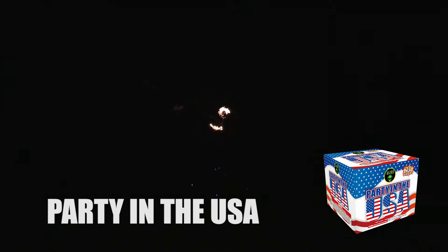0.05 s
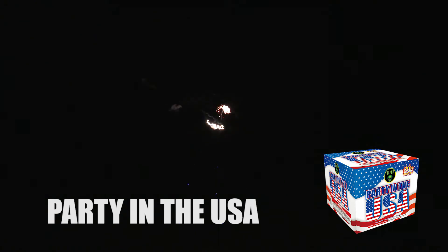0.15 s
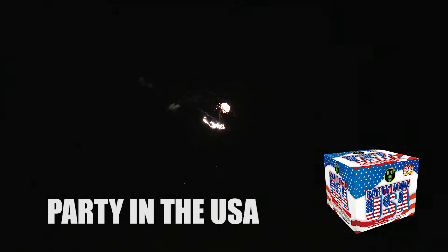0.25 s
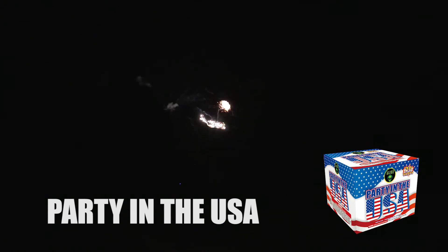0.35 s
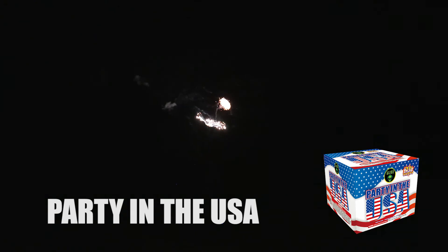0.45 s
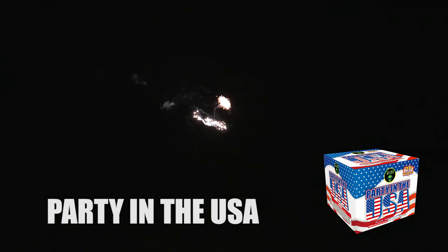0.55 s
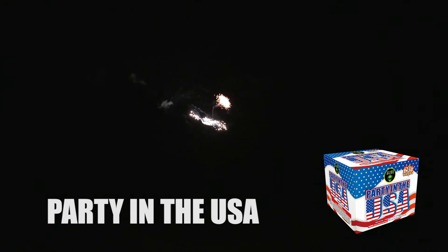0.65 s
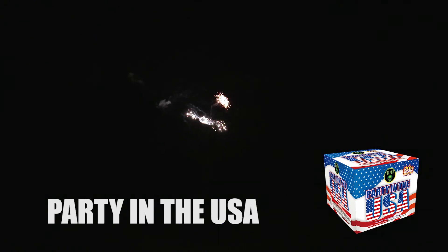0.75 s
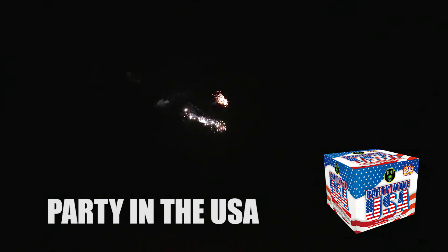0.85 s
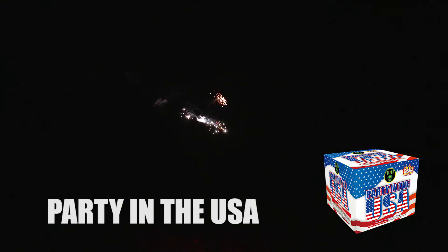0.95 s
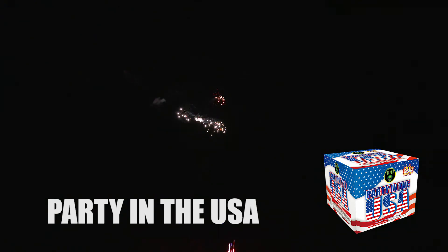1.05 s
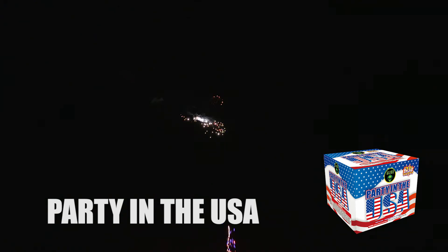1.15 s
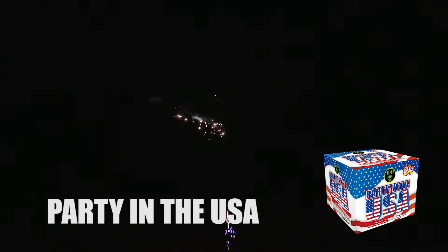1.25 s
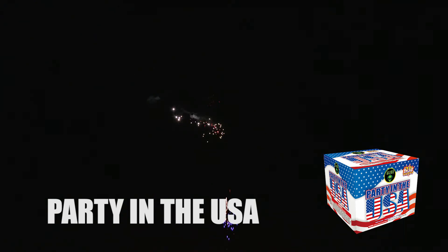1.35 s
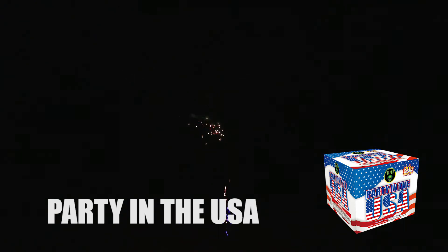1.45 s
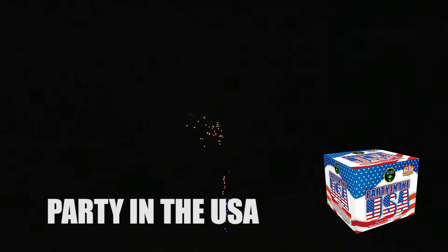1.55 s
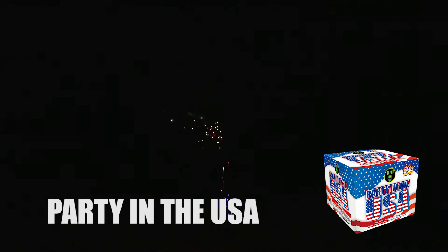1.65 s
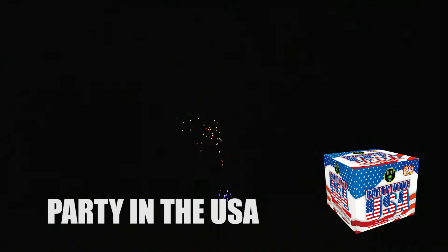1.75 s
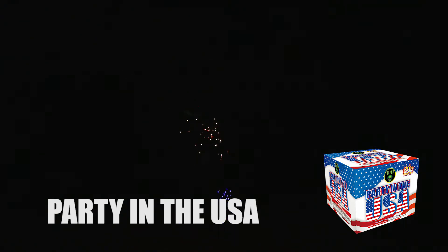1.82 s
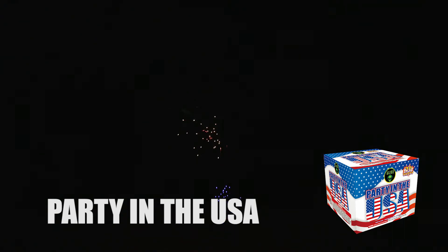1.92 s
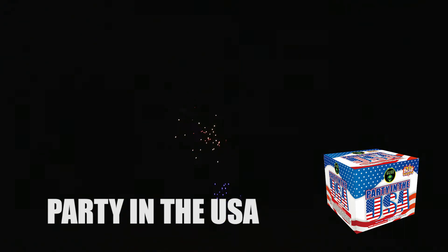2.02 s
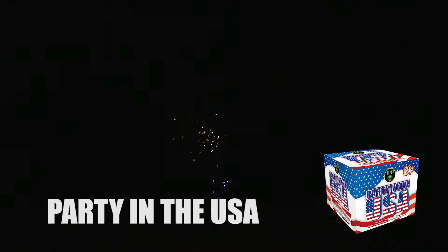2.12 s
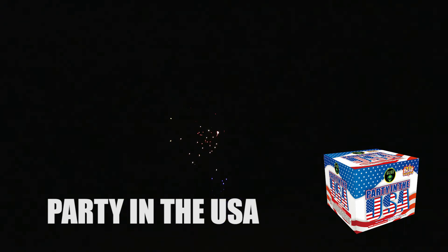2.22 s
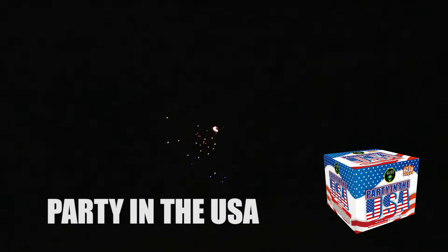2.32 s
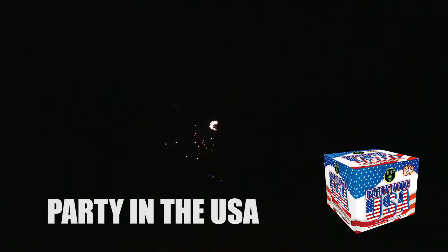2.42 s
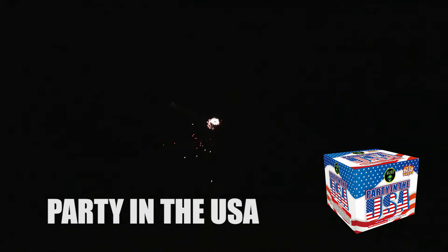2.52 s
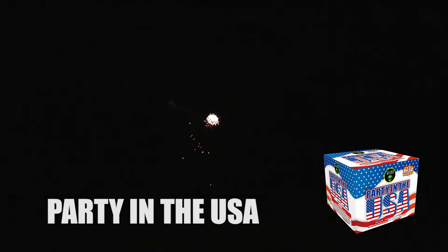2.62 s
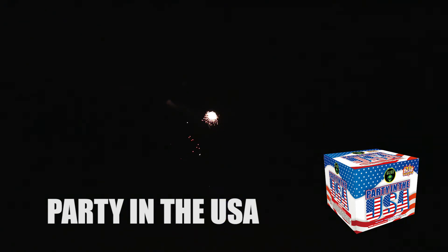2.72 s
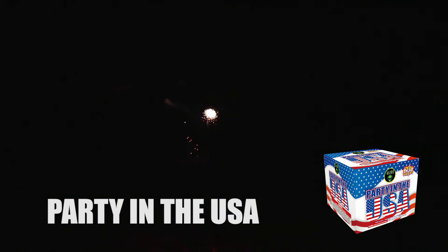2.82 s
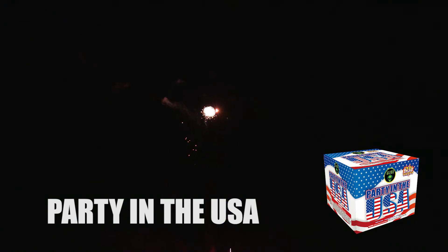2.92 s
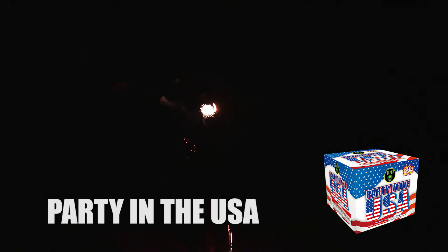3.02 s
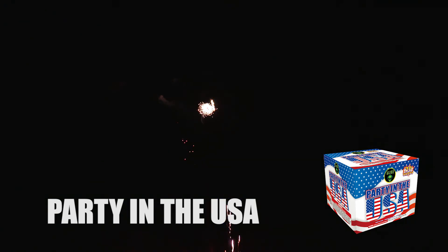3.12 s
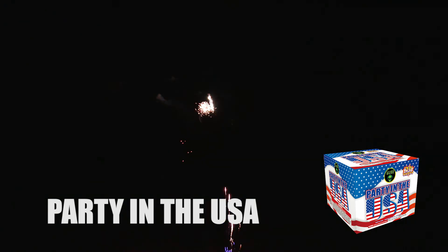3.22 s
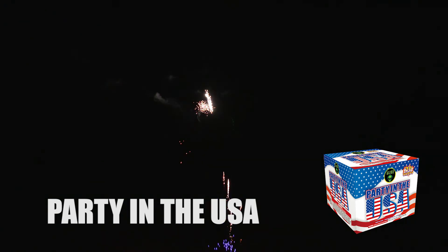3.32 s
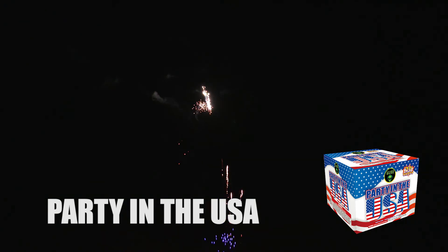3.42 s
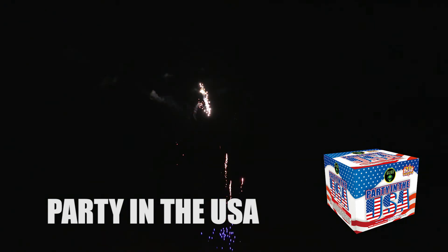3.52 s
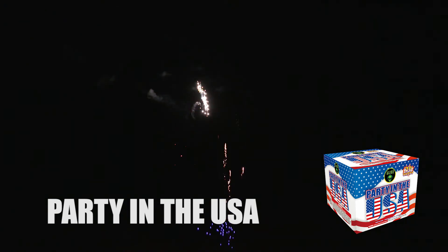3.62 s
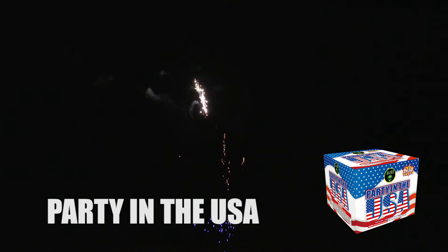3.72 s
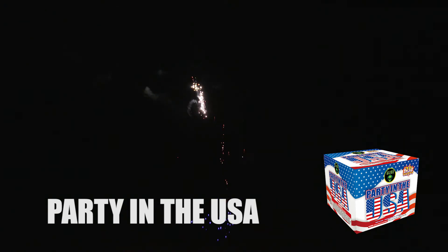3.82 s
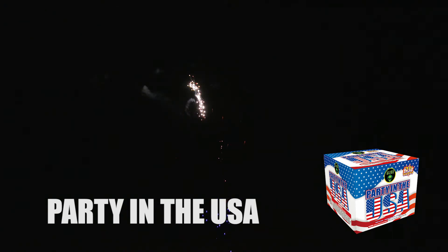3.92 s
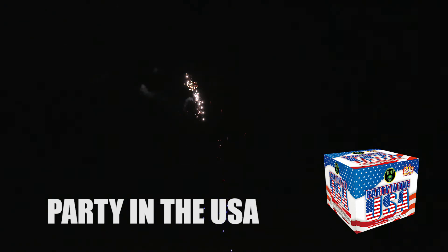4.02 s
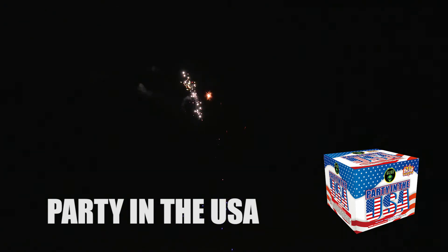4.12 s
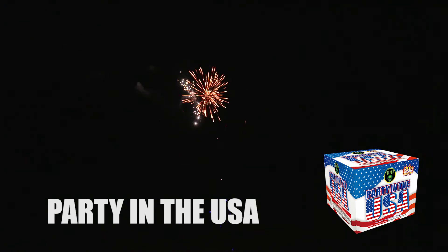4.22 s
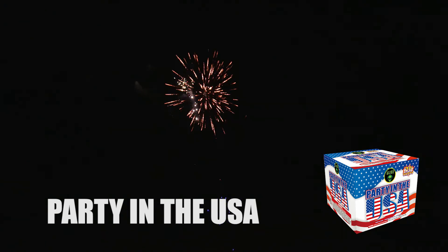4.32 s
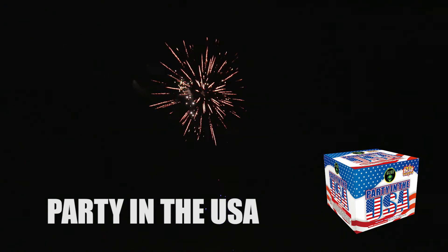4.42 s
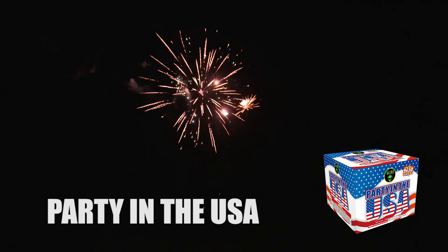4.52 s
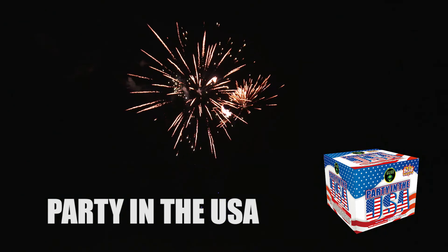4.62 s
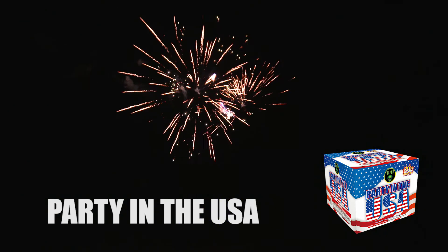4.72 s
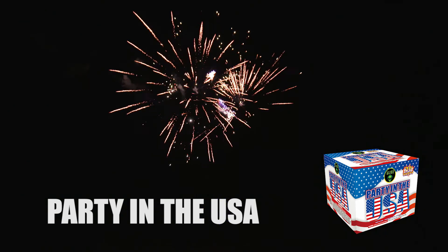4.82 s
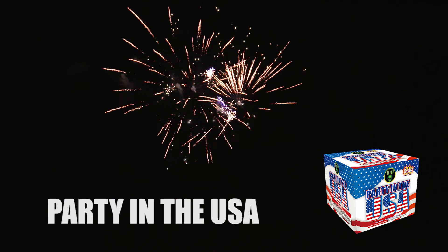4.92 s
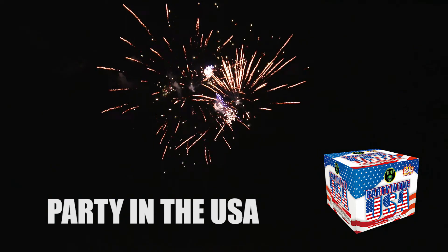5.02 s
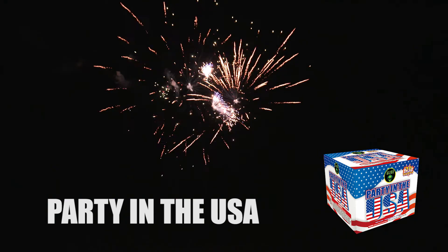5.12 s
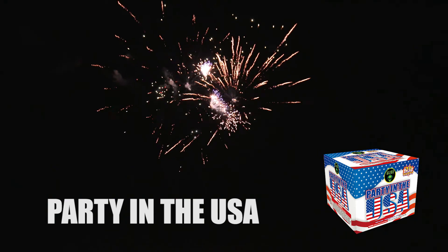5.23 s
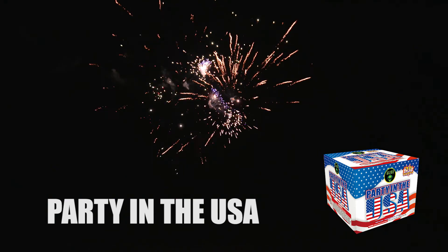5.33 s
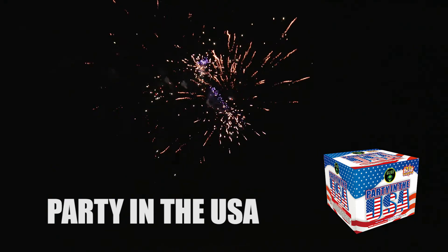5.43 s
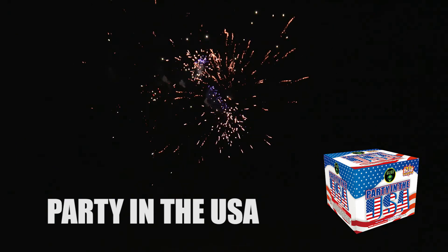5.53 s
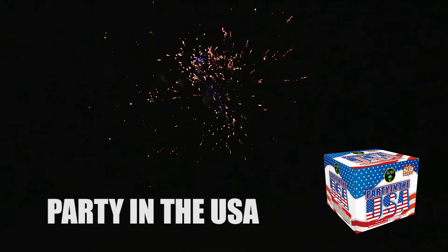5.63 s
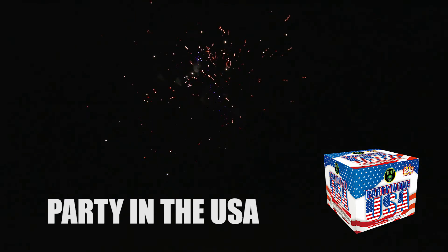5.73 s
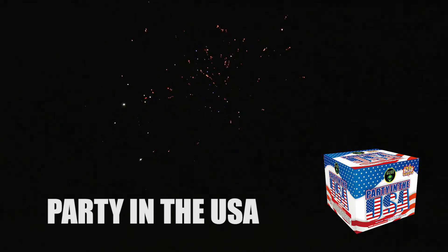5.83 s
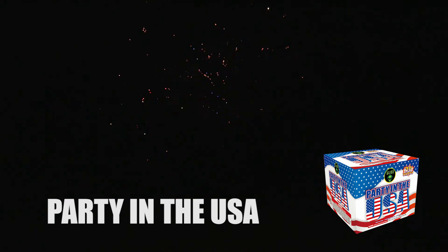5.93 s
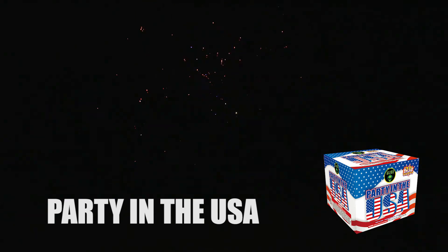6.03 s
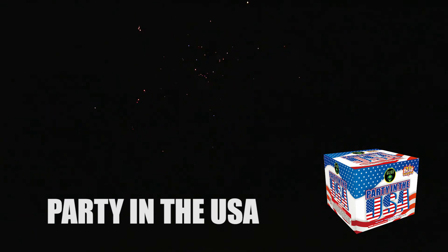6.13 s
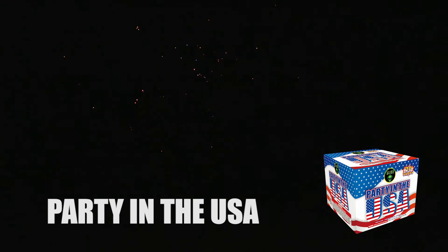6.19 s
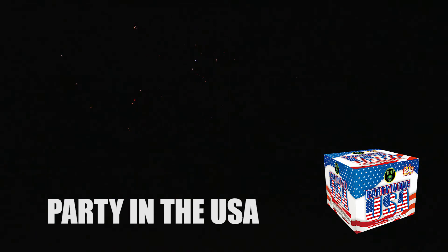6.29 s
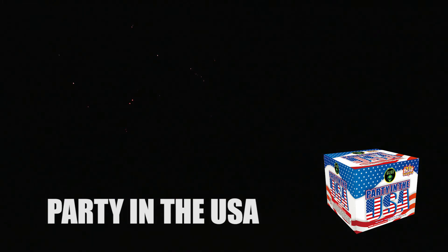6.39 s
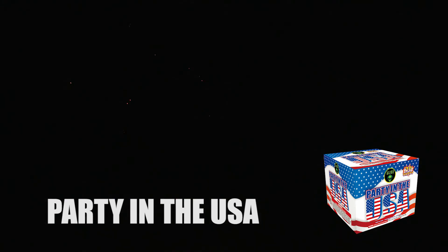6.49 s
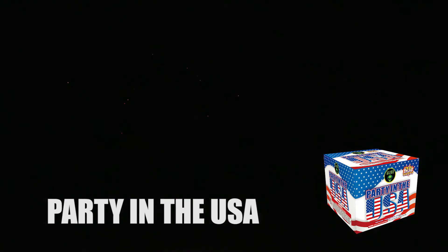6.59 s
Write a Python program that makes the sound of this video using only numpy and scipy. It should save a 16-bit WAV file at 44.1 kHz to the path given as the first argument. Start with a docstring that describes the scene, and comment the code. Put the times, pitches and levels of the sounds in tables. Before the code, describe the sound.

Outdoor fireworks in mono, captured across a field. The rumble of an earlier shell lingers under faint sizzling. A double launch thump echoes off a far wall, then a rapid four-shot volley, each leaving rolling low noise. Glitter hisses softly between. Two big cracking bursts come close together, followed by a furious snapping crackle, dull distant echoes and a fade to quiet hum.

```python
"""A multi-shot firework cake at night, heard from a field some way off.
Lift charges thump in quick volleys and shells burst overhead, each blast a set of pressure fronts.
Glitter stars hiss as thousands of tiny sparks, and a cloud of crackle stars pops as tiny shock waves.
The ground, a far wall and the tree line answer with echoes and rolling noise, and brief tones whistle.
A low town hum of filtered noise lies under it, and all fades out at the end."""
import sys
import numpy as np
from scipy import signal
from scipy.io import wavfile
from scipy.ndimage import uniform_filter1d

SR = 44100
rng = np.random.default_rng(int(sys.argv[2]) if len(sys.argv) > 2 else 0)


def generate_wav(sig):
    """Save sig (samples, or channels by samples) to the path in sys.argv[1] as 16-bit PCM at SR."""
    pcm = np.round(np.clip(np.atleast_2d(sig).T, -1, 1) * 32767).astype(np.int16)
    wavfile.write(sys.argv[1], SR, pcm)


N = 293529  # length in samples
BLAST_SAMPLES = 2205  # 50 ms, room for one blast


def undb(db):
    """Turn decibels into a plain factor."""
    return 10 ** (np.asarray(db) / 20)


def curve(table):
    """Join the columns of a table by straight lines over time; the first column is in seconds."""
    s, *columns = np.transpose(table)
    return [np.interp(np.arange(N) / SR, s, column) for column in columns]


def band(x, hz, width, order=1):
    """Keep a band of the given width around hz (band-pass)."""
    low = np.sqrt(hz ** 2 + width ** 2 / 4) - width / 2
    high = min(low + width, SR / 2.05)
    return signal.sosfilt(signal.butter(order, [low, high], "band", fs=SR, output="sos"), x)


def dull(x, hz):
    """Take off the treble above hz (low-pass), which rounds off sharp fronts."""
    return signal.sosfilt(signal.butter(2, hz, fs=SR, output="sos"), x)


def unit(x):
    """Scale to an average (rms) level of 1."""
    return x / np.sqrt(np.mean(x ** 2))


def walk(rate, size=N):
    """Wander at random: levels held for 1 / rate seconds and smoothed twice, with a spread near 1."""
    k = int(SR / rate)
    steps = np.repeat(rng.standard_normal(size // k + 1), k)
    return 1.4 * uniform_filter1d(uniform_filter1d(steps, k), k)[:size]


def ebb(s, db_per_decade, knee_s):
    """Loss in dB that is quick at first and slows down."""
    return db_per_decade * np.log10(1 + np.maximum(s, 0) / knee_s)


def train(s, size):
    """Single-sample clicks at the given times in seconds."""
    return np.bincount((np.asarray(s) * SR).astype(int), weights=size, minlength=N)[:N]


def spread(x, response):
    """Put a copy of the response at every click (convolution)."""
    return signal.oaconvolve(x, response)[:N]


def blast(fronts, slow=0.91):
    """Each pressure front jumps up, falls through zero into suction and recovers."""
    ms = np.arange(BLAST_SAMPLES) * 1000 / SR / slow  # a larger slow stretches all the times
    out = 0
    for delay, db, rise, push, decay in fronts:
        u = np.maximum(ms - delay, 0)
        jump = 1 - np.exp(-u / rise)
        out = out + undb(db) * jump * (1 - u / push) * np.exp(-u / decay)
    return out


def roll(shape, air):
    """Answer of the land: half-octave noise bands; the bass comes in lumps, the treble dies evenly."""
    s, out, air = np.arange(2 * SR) / SR, 0, np.array(air)
    first, decade, knee, after, wide, swell = shape
    together = 1.5 * walk(60, size=len(s))  # flutter in dB shared by all bands
    slope = swell * np.exp(-.5 * ((s - after) / wide) ** 2)
    for hz in 40 * 2 ** np.arange(0, 8.6, .5):
        db, fall = (np.interp(np.log(hz), np.log(air[:, 0]), air[:, k]) for k in (1, 2))
        noise = unit(band(rng.standard_normal(len(s)), hz, hz / 2.99, order=2))
        own = 2.2 * walk(30, size=len(s))
        lumps = first - ebb(s, decade, knee) + slope + together + own
        # above 700 Hz a band follows the lumps less and less
        out = out + noise * undb(db - fall * s ** 0.46 + min(700 / hz, 1) * lumps)
    return out * np.minimum(s / 0.00083, 1)


def echoes(x, table):
    """Delayed, coloured copies from walls."""
    out = 0
    for delay, db, hz, width in table:
        out = out + undb(db) * np.roll(band(x, hz, width, order=2), int(delay * SR))
    return out


def town():
    """Town hum: half-octave noise bands that each waver on their own, and a narrow low drone."""
    # Colour of the town noise. Each row: pitch in Hz, relative level in dB per Hz.
    town_colour = [(15, -38), (25, -8), (59, 1.5), (141, -4.5), (775, -24.5), (911, -23), (1560, -24.5),
                   (2910, -27.5), (14800, -35), (16000, -39)]
    # Level of the drone over time. Each row: time in seconds, level in dB.
    drone_level = [(0.0, -57.5), (0.15, -78), (0.55, -63), (0.9, -63), (1.1, -78), (1.55, -65),
                   (2.75, -62.5), (3.0, -67), (3.4, -56), (4.3, -61)]
    town_db = -61.5  # all bands together
    hz_points, db_points = np.transpose(town_colour)
    out = 0
    for hz in 28 * 2 ** np.arange(0, 9.3, .5):
        db = np.interp(np.log(hz), np.log(hz_points), db_points) + 1.2 * walk(0.7)
        out = out + undb(db) * band(rng.standard_normal(N), hz, hz / 3.7, order=2)
    drone = unit(band(rng.standard_normal(N), 66, 23)) * undb(curve(drone_level)[0])
    return unit(out) * undb(town_db) + drone


def whistles():
    """Short tones that glide in a straight line from one pitch to another."""
    # Brief whistles after the first volley. Each row: start in seconds, length in seconds,
    # first pitch in Hz, last pitch in Hz, rms level in dB at the middle.
    whistle_rows = [(1.015, .01, 3350, 3250, -58), (1.05, .01, 2700, 2800, -56),
                    (1.072, .022, 3030, 2980, -60), (1.088, .012, 2850, 2500, -52),
                    (1.105, .014, 2480, 2800, -52), (1.149, .028, 2820, 2840, -51),
                    (1.165, .02, 2620, 2620, -57), (1.24, .025, 2580, 2640, -57)]
    out = np.zeros(N)
    for s, length, hz0, hz1, db in whistle_rows:
        n, i = int(length * SR), int(s * SR)
        tone = np.sin(2 * np.pi * np.cumsum(np.linspace(hz0, hz1, n)) / SR)
        out[i:i + n] += np.sqrt(2) * undb(db) * np.hanning(n) ** .5 * tone
    return out


def glitter():
    """Thousands of sparks a second, heard directly and by the ground; spinning stars make the hiss throb."""
    # Stars flare up, burn and die to embers. Each row: full from in seconds, full until in seconds,
    # level in dB, rise in dB per second, ebb in dB per decade, lag of the ground copy in ms.
    glitter_rows = [(0.045, 0.301, -65, 98, 16, 1.65), (0.658, 0.822, -44, 91, 35, 1.68),
                    (2.48, 2.6, -68.5, 166, 13, 1.7), (2.74, 2.9, -68, 75, 20.5, 1.53),
                    (3.08, 3.388, -54.5, 73.5, 32.5, 1.57)]
    # Pressure of one spark. Each row: delay in ms, level in dB, rise in ms, push in ms, decay in ms,
    # with all times then stretched by the blast's slowness.
    spark_fronts = [(0.0012, 30, 0.048, 0.058, 0.052)]
    sparks_per_s, spin_hz, throb_db = 6000, 28.3, 2
    ember_s, ground_db, ends_s = 0.097, -8, 4.39
    # side bands of the hiss: dB against the core, and dB gained for each dB the hiss is fainter
    treble, body = (-8, .22), (-14, 0.34)
    sizzle_db, sizzle_gain = -20.5, .4

    now = np.arange(N) / SR
    levels = []
    for start, stop, db, rise, fall, _ in glitter_rows:
        flare = rise * np.maximum(start - now, 0)
        levels.append(undb(db - flare - ebb(now - stop, fall, ember_s)))
    # dB below -40.5; a fainter hiss is broader
    fainter = -40.5 - 10 * np.log10(np.sum(np.square(levels), axis=0))
    fainter = np.minimum(fainter, 25)

    turn = np.cumsum(spin_hz * (1 + .08 * walk(9)) / SR) % 1
    throb = throb_db * (1 - 2 * turn)  # falls through each turn, then jumps back up
    spark_db = 1.4 * rng.standard_normal(N) + 0.81 * walk(60) + throb
    sparks = (rng.random(N) < sparks_per_s / SR) * undb(spark_db)
    sparks = spread(sparks, blast(spark_fronts))

    hiss = unit(band(sparks, 2860, 2200))  # the core
    for (db, gain), hz, width in (treble, 5680, 5000), (body, 1100, 1020):
        hiss = hiss + undb(db + gain * fainter) * unit(band(sparks, hz, width))
    sizzle = unit(band(sparks, 14000, 4300, order=2))
    hiss = dull(hiss, 11000) + undb(sizzle_db + sizzle_gain * fainter) * sizzle

    out = 0
    for level, row in zip(levels, glitter_rows):
        ground = undb(ground_db) * np.roll(hiss, int(row[5] * SR / 1000))
        out = out + level * (hiss + ground)
    return out * (now < ends_s)


def crackle():
    """Tiny shock waves: single stars at the edges, a random swarm in the middle."""
    # Crackle stars heard one by one. Each row: time in seconds, level in dB.
    single_pops = [(1.8478, -42.0), (2.168, -50.0), (3.152, -31.0), (5.0259, -30.0), (5.1271, -19.1),
                   (5.1524, -14.2), (5.1977, -21.0), (5.1993, -16.6), (5.2096, -14.2), (5.2192, -21.0),
                   (5.2424, -16.8), (5.2433, -12.5), (5.2507, -14.5), (5.2541, -11.0), (5.2567, -14.5),
                   (5.2615, -14.4), (5.2632, -11.2), (5.2675, -10.6), (5.2743, -10.9), (5.5966, -15.7),
                   (5.608, -13.9), (5.6141, -14.2), (5.6187, -14.4), (5.6196, -13.0), (5.6356, -14.9),
                   (5.6622, -16.8), (5.668, -16.1), (5.6792, -15.1), (5.6948, -14.4), (5.7256, -22.1)]
    # Pressure of one pop. Each row: delay in ms, level in dB, rise in ms, push in ms, decay in ms,
    # with all times then stretched by the slowness of the part of the sky.
    pop_fronts = [(0, 23, .15, .12, .09), (.33, -3, .1, .4, .15), (1.65, 9.5, .05, .2, .07)]
    # fuse times scatter as a bell around the middle; later pops are a little weaker
    from_s, to_s, middle_s, scatter_s = 5.278, 5.592, 5.435, .1
    peak_pops_per_s, pop_db, sag_db_per_s = 1250, -16, 10.5
    # scattered noise after each pop: level, and time to drop by 60 dB
    tail_db, tail_t60_s, far_db, far_t60_s = -13.5, 0.018, -47, 1
    ground_ms, ground_db, ground_hz, air_hz = 1.669, -8.5, 1300, 6900

    s, db = np.transpose(single_pops)
    now = np.arange(N) / SR
    late = now - middle_s
    rate = peak_pops_per_s * np.exp(-.5 * (late / scatter_s) ** 2)
    size_db = pop_db - sag_db_per_s * np.clip(late, -1, 1)
    swarm = (rng.random(N) < rate / SR) * (now > from_s) * (now < to_s)
    singles = train(s - .00012, undb(db))  # set off 0.12 ms ahead of the listed times
    hits = singles + swarm * undb(size_db + 1.32 * rng.standard_normal(N))

    t = np.arange(SR) / SR
    far = unit(band(rng.standard_normal(SR), 900, 2500)) * undb(far_db - 60 * t / far_t60_s)
    out = spread(hits, far * np.minimum(t / 0.0058, 1))
    # stars sit in different parts of the sky: each part has its own ground lag and scatter
    part = rng.integers(0, 8, N)
    t = t[:BLAST_SAMPLES]
    for k, slow in enumerate(np.linspace(.95, 1.05, 8)):
        near = unit(band(rng.standard_normal(BLAST_SAMPLES), 1920, 3500))
        near = near * undb(tail_db - 60 * t / tail_t60_s) * np.minimum(t / 0.00057, 1)
        out += spread(hits * (part == k), blast(pop_fronts, slow) + near)
    # the soft ground returns the low part strongly
    out += undb(ground_db) * np.roll(dull(out, ground_hz), int(ground_ms * SR / 1000))
    return dull(band(out, 3400, 18000), air_hz)  # tiny charges carry no bass


def thuds():
    """A far blast has lost its edge: a swing or two of pressure."""
    # Dull single echoes off buildings and slopes. Each row: start in seconds, peak level in dB, pitch in Hz.
    thud_rows = [(1.026, -27, 317), (1.083, -36.5, 342), (1.117, -35, 237), (1.152, -31.5, 223),
                 (3.151, -28, 1160), (4.572, -20, 270), (4.584, -26, 291), (4.783, -29.5, 227),
                 (4.94, -26, 415), (4.962, -29.5, 260), (5.222, -30.5, 350), (5.795, -42, 195),
                 (5.823, -37.5, 362), (5.987, -45, 1010), (6.088, -44, 342), (6.122, -44.5, 560),
                 (6.345, -47, 500)]
    out, t = np.zeros(N), np.arange(1500) / SR
    for s, db, hz in thud_rows:
        turns = hz * t
        swing = np.sin(2 * np.pi * turns) * turns * np.exp(-turns / 0.61)
        i = int(s * SR)
        out[i:i + 1500] += undb(db) * swing / np.abs(swing).max()
    return out


def bursts():
    """Shells break overhead as sharp blasts; the land rolls each back in its own way."""
    # Shell bursts. Each row: time in seconds, level in dB.
    burst_rows = [(4.3905, -5.5), (4.7492, -6)]
    # Fronts of one burst, direct and by the ground. Each row: delay in ms, level in dB, rise in ms,
    # push in ms, decay in ms, with all times then stretched by the blast's slowness.
    burst_fronts = [(0, 8.6, 0.12, 0.26, 0.45), (1.3, 2.4, 0.065, 0.3, 0.15), (1.7, 15, .15, .65, .6),
                    (3.4, 5.1, 0.069, 4.9, 2.96)]
    # Distinct echoes. Each row: delay in seconds, level in dB, centre in Hz, width in Hz.
    burst_echoes = [(0.0582, -18, 2180, 3000), (0.398, -11, 170, 197)]
    # How the roll ebbs and swells once. The one row: first level in dB, ebb in dB per decade,
    # knee in seconds, slope answers after in seconds, its spread in seconds, its swell in dB.
    burst_roll = (1, 15.55, 0.041, .18, 0.042, 5.6)
    # Colour of the roll. Each row: pitch in Hz, level in dB, extra fall in dB after one second.
    burst_air = [(49.76, -64, 4.1), (121, -48, -2), (298, -35, 6.8), (600, -39.5, 6.5), (1210, -44.5, 17),
                 (3000, -42, 32.5), (8140, -46, 44), (15000, -59.5, 30)]
    land_db = 7  # level of the roll against its blast
    earlier_s, earlier_db = 0.35, -15.5  # a shell that broke this long before the start still rolls

    s, db = np.transpose(burst_rows)
    dry = spread(train(s, undb(db)), blast(burst_fronts))
    land = np.zeros(N)
    for at, level_db in burst_rows:
        land += spread(train([at], [undb(level_db + land_db)]), roll(burst_roll, burst_air))
    earlier = roll(burst_roll, burst_air)[int(earlier_s * SR):]
    land[:len(earlier)] += undb(earlier_db) * earlier
    return dry + echoes(dry, burst_echoes) + land


def thump(s, db, lead_ms, sputter_db, slow):
    """One charge: gas sputters past the shell, then the blast leaves the tube and rings it briefly."""
    # Fronts of one blast, direct and by the ground. Each row: delay in ms, level in dB, rise in ms,
    # push in ms, decay in ms, with all times then stretched by slow.
    lift_fronts = [(0, 7, 0.21, 0.37, 0.64), (.68, -3.5, 0.18, 0.25, 0.55), (2.3, 7, 1.1, 2.9, 3.4)]
    tube_hz, tube_db, tube_decay_ms = 1100, -6.5, 1.0  # pitch and decay at slow = 1
    out, i, n = np.zeros(N), int(s * SR), int(lead_ms * SR / 1000)
    noise = rng.standard_normal(400)
    gas = unit(band(noise, 1200, 1100, order=2)) + 0.62 * unit(band(noise, 6500, 4000, order=2))
    # the sputter sets in over 8 samples and lasts 40 samples into the blast
    out[i - n:i + 40] = undb(sputter_db) * gas[-n - 40:] * np.minimum(np.arange(n + 40) / 8, 1)
    ms = np.arange(BLAST_SAMPLES) * 1000 / SR / slow
    tube = undb(tube_db) * np.sin(2 * np.pi * tube_hz * ms / 1000) * np.exp(-ms / tube_decay_ms)
    out[i:i + BLAST_SAMPLES] += blast(lift_fronts, slow) + tube
    return undb(db) * out


def lifts():
    """Volleys of blasts from the tubes with their echoes and roll, and the small breaks."""
    # Lift charges. Each row: time in seconds, level in dB, sputter before the blast in ms,
    # sputter in dB against the level, slowness (1 = usual).
    lift_rows = [(0.9339, -7, 1.4, -12.5, 1.04), (.976, -12, 0.37, -9, 0.98),
                 (2.9063, -6.5, 3.05, -14, 1.02), (2.9439, -7, 2.56, -18, 0.99),
                 (2.9798, -8.5, 3, -16.5, 1.05), (3.0215, -11, 2, -16, 1.12)]
    # Small breaks, the same blast but weaker and mostly much slower. Each row: time in seconds,
    # level in dB, sputter before the blast in ms, sputter in dB against the level, slowness.
    break_rows = [(0.1049, -30.5, 2.5, -9, 1.99), (4.7248, -23, 0.78, -5, 1.5)]
    # Distinct echoes. Each row: delay in seconds, level in dB, centre in Hz, width in Hz.
    lift_echoes = [(0.011, -16, 766, 830), (0.0098, -21.5, 3800, 6500), (.4468, -11.5, 166, 188),
                   (.4465, -20, 890, 377)]
    # How the roll ebbs and swells once. The one row: first level in dB, ebb in dB per decade,
    # knee in seconds, slope answers after in seconds, its spread in seconds, its swell in dB.
    lift_roll = (-6, 17, .07, .205, .05, 10)
    # Colour of the roll. Each row: pitch in Hz, level in dB, extra fall in dB after one second.
    lift_air = [(40, -61.5, 10), (90, -50, -3), (170, -43, -3.5), (288, -35.5, 9), (408, -41.5, 11.5),
                (710, -49.5, 11.5), (1201, -40, 35.5), (3000, -53.5, 40), (8020, -59, 46.5),
                (15000, -60.5, 50)]
    land_db = 5.5  # level of the roll against its blast

    dry = band(sum(thump(*row) for row in lift_rows), 850, 15000)
    small = dull(sum(thump(*row) for row in break_rows), 5000)
    s, db = np.transpose(lift_rows + break_rows)[:2]
    land = spread(train(s, undb(db + land_db)), roll(lift_roll, lift_air))
    return dry + echoes(dry, lift_echoes) + small + land


def scene():
    """All layers added up in the air, as one channel."""
    background = town() + whistles()
    stars = glitter() + crackle()
    blasts = thuds() + bursts() + lifts()
    return (background + stars + blasts)[None]


def record(dry):
    """The microphone drops the deepest bass and rounds the loudest peaks; the level fades out; the top is cut."""
    # The fade. Each row: time in seconds, level in dB.
    fade = [(0, 0), (5.75, -1), (6.0, -4.5), (6.3, -9.5), (6.66, -17.5)]
    loudest, top_hz = 0.54, 15800
    x = signal.sosfilt(signal.butter(2, 42, "high", fs=SR, output="sos"), dry)
    x = loudest * np.tanh(x / loudest)
    x = x * undb(curve(fade)[0])
    return signal.sosfilt(signal.ellip(10, .2, 80, top_hz, fs=SR, output="sos"), x)


dry = scene()
out = record(dry)
generate_wav(out)
```